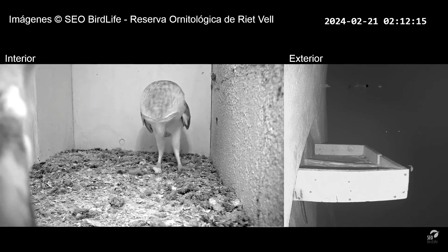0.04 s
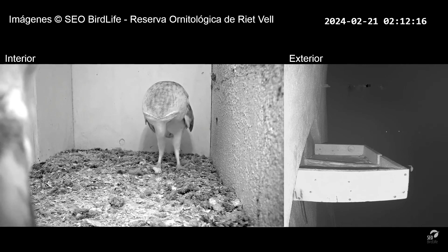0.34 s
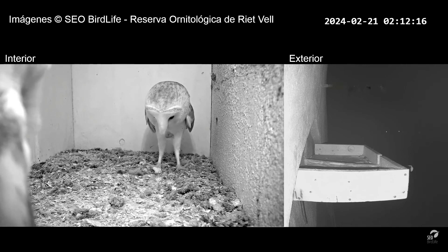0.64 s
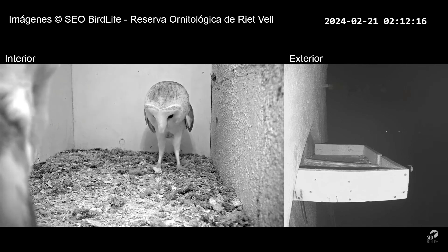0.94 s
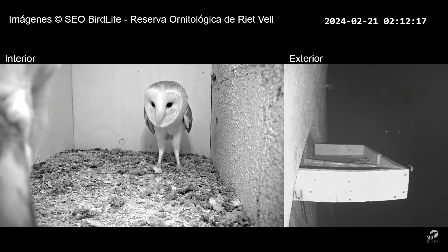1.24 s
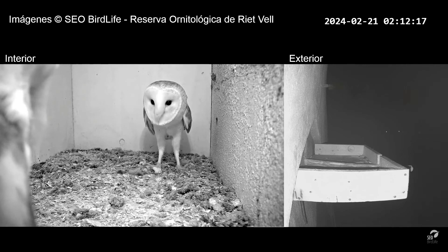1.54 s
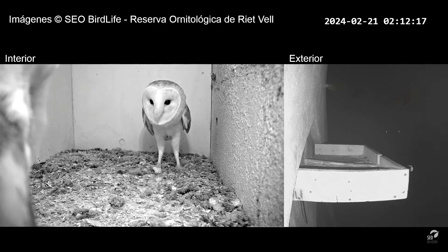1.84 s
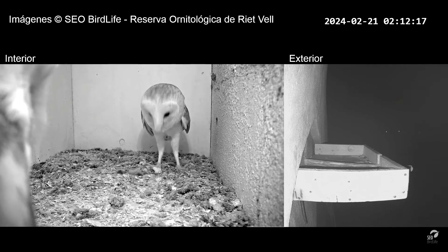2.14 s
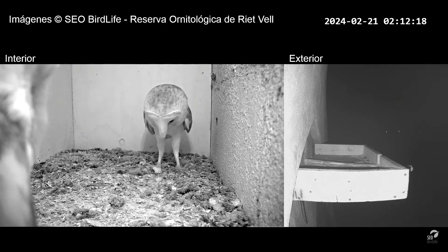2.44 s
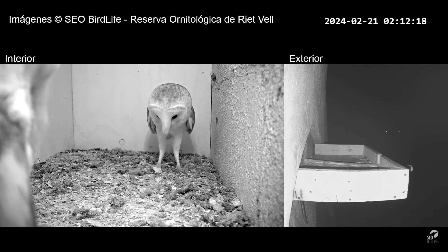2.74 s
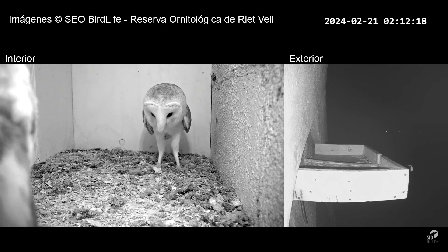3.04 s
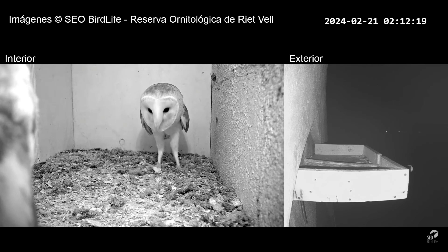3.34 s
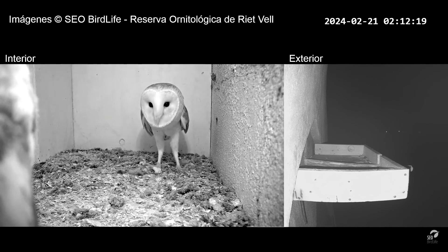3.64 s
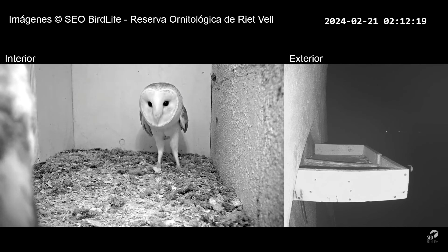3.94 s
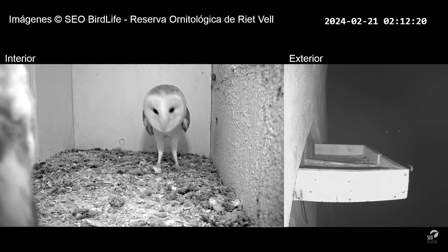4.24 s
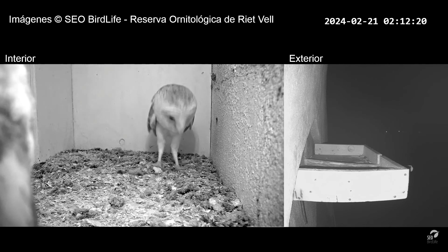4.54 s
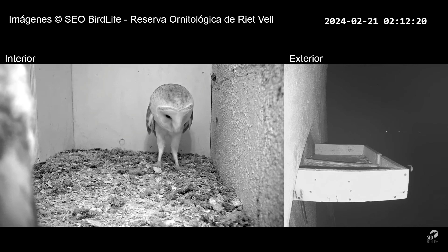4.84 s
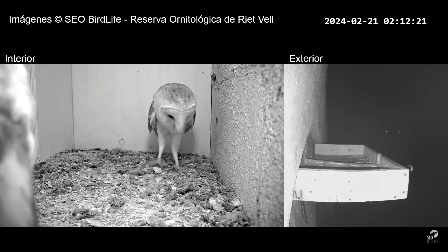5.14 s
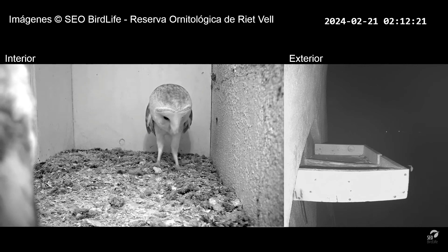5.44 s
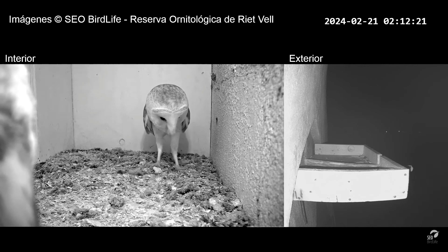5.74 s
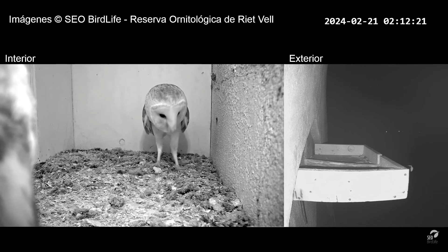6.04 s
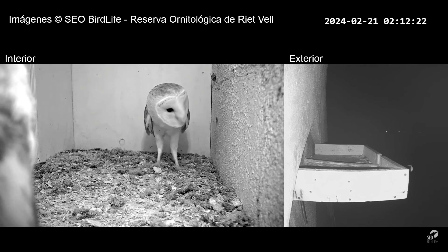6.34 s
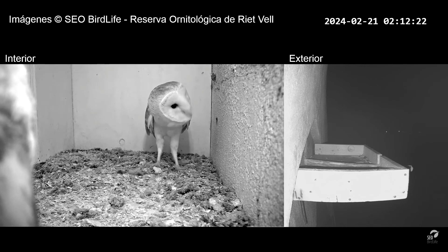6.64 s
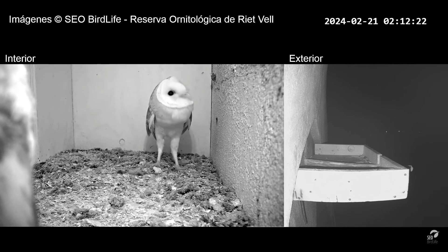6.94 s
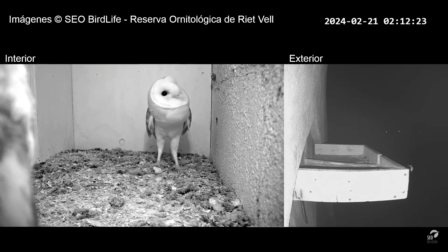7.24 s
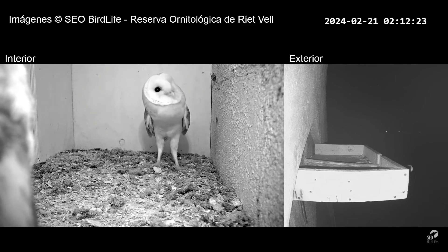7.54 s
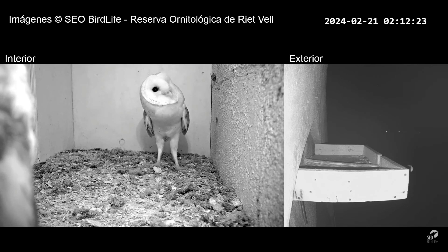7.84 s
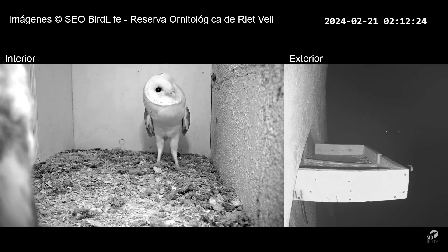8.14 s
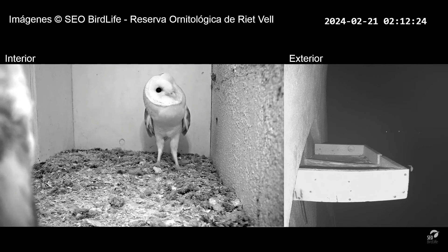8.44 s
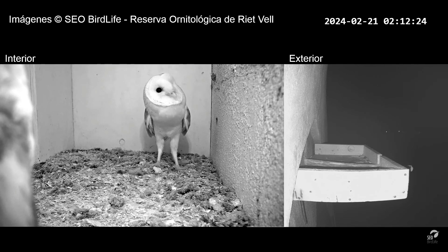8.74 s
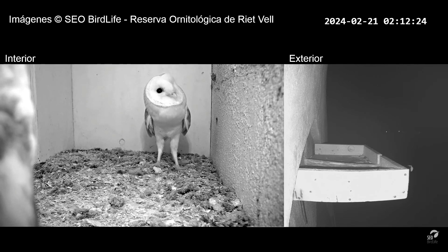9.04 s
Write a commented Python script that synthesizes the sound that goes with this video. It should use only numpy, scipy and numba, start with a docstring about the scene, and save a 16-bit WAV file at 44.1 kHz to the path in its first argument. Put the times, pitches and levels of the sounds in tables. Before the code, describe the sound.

Three loud, rasping owl screeches swell and flutter inside a wooden box, while another owl hisses faintly further off.

```python
"""A long, hissing barn owl screech, right up close in a wooden nest box: the first of three.
Each is air rasping through two throat resonances; it swells, brightens and breaks into a fast,
whistling flutter. The box colours the voice, and the small microphone overloads on the peaks.
Underneath lie night hiss and faint mains hum. A few bumps ring the boards of the box,
a second owl hisses further off, and a distant bird pipes short notes."""
import sys
import numpy as np
from scipy import signal
from scipy.fft import rfft, irfft
from scipy.io import wavfile
from numba import njit

SR = 44100
rng = np.random.default_rng(int(sys.argv[2]) if len(sys.argv) > 2 else 0)


def generate_wav(signal):
    """Clip the signal to [-1, 1] and save it as 16-bit WAV at the path in sys.argv[1]."""
    frames = np.transpose(np.atleast_2d(signal))
    scaled = np.clip(frames, -1, 1) * 32767
    pcm = np.round(scaled).astype(np.int16)
    wavfile.write(sys.argv[1], SR, pcm)


N = 409688
TIME = np.arange(N) / SR
FFT_SIZE = 2 ** 19
BIN_HZ = np.maximum(np.arange(FFT_SIZE // 2 + 1) * SR / FFT_SIZE, 1)

# The near owl's screeches. Each row: start and end in seconds, relative level in dB, swell in dB,
# upper resonance trim in dB, midpoint and spread of the flutter's fade-in in seconds, its depth 0-1.
NEAR_SCREECHES = [(-.22, 1.343, -4.5, 27, -6, 0.43, .34, .96), (2.0, 3.593, -7.5, 22, -5, 2.72, 0.26, .88),
                  (4.93, 6.435, -8, 25.5, -8.5, 5.874, .25, 0.5)]
# The two whistles in every flutter. Each row: place and length in cycles, pitch as a ratio to the main
# resonance, glide of that ratio per cycle, relative level in dB.
FLUTTER_WHISTLES = [(.9, .07, .86, .45, 7.5), (0.02, 0.043, 1.83, -1.0, 10)]
# Tone of the air rushing from the bill. Each row: frequency in Hz, gain in dB.
AIR_EQ = [(150, -20), (280, -23), (350, -3), (600, -1.5), (900, -6), (1250, 9), (2500, -4.5), (4000, -21),
          (5400, -27), (6300, -18.5), (7200, -10.5), (8400, -16.5)]
# How the open bill colours the voice. Each row: frequency in Hz, gain in dB.
BILL_EQ = [(800, -14.5), (1250, -2), (1550, -6), (2300, -1.5), (2600, -1), (3600, -4), (4000, -9),
           (4450, -0.5), (4750, -10), (5600, -3), (6400, -9.5), (7200, -5)]
# Air resonances and nulls of the box. Each row: centre in Hz, width in Hz, gain in dB.
BOX_RESONANCES = [(363, 30, 9.5), (402, 82, -9), (495, 30, 8), (634, 63, 6.5), (931, 250, -6),
                  (1125, 16, 4.5), (1170, 41, -11), (1500, 42, 10.5), (1660.5, 73, -10), (1702.2, 83, 13),
                  (1908, 18, 2), (2043, 100, -6.5), (2118, 38, 4.5), (2303, 120, 3.5), (2475, 74, -7.5),
                  (2630, 83, -8.5), (2747, 65, 6.5), (2866, 50, -7), (2972, 120, 10.5), (3050, 180, -9),
                  (3150, 56, 9), (3277, 46, 10.5), (3365, 43, -7.5), (3480, 24, 6), (3750, 50, 1.5),
                  (4370, 90, 4), (4600, 130, -7), (5000, 46, 4.5)]
# Tone of the night bed. Each row: frequency in Hz, gain in dB.
NIGHT_EQ = [(20, -2.5), (45, 3), (75, -3), (120, -11), (300, -11), (480, -13.5), (620, -11.5), (850, -16),
            (1700, -19), (4800, -23.5), (7000, -24), (8700, -39)]
# Mains hum. Each row: multiple of 50 Hz, peak level in dB.
HUM_HARMONICS = [(1, -51.5), (3, -61.5)]
# Bumps on the box. Each row: start in seconds, ring gain in dB, contact corner in Hz (lower is softer),
# clatter level in dB, scrape level in dB.
BOX_BUMPS = [(0.325, -34.5, 130, -72, -57), (4.339, -27.5, 375, -37.5, -36.5), (4.750, -27, 1200, -25, -31),
             (5.422, -34, 250, -36, -32)]
# Modes of the box's boards. Each row: frequency in Hz, relative level in dB, seconds to fall 60 dB.
BOARD_MODES = [(29.06, -10, 0.73), (53, -19.5, .5), (70.65, 2.5, 0.42), (87.2, -9.5, .4), (112, -11, 0.57),
               (139, -6.5, 0.39), (154, -9, 0.7), (182, -8.5, 0.6), (336, -21.5, 0.59), (360, -16.5, .25),
               (472, -6, 0.12), (540, 2, 0.079), (720, -11.5, 0.18), (798, -0.5, 0.027), (1086, -19, 0.075),
               (1200, -10, 0.076)]
# Tone of loose wood clattering. Each row: frequency in Hz, gain in dB.
CLATTER_EQ = [(100, -3.5), (220, -0.5), (400, -7.5), (800, -1), (1200, -28), (2000, -20.5), (5000, -35.5)]
# The far owl's hisses. Each row: start and end in seconds, relative level in dB, swell in dB,
# opening flutter rate in Hz.
FAR_CALLS = [(3.3, 4.805, -38.8, 21, 49.8), (5.6, 7.054, -40, 21, 48.3), (8.64, 10.15, -35.5, 32, 49)]
# The far owl's peaky tone. Each row: frequency in Hz, gain in dB.
FAR_EQ = [(1300, -27.5), (1690, 12.5), (1790, -2.5), (1900, 11), (2150, -6.5), (2400, 10.5), (2900, -2.5),
          (3120, 7.5), (3400, -4.5), (3780, -0.5), (4100, -15.5), (6000, -14)]
# The bird's notes. Each row: start and length in seconds, pitch near the top in Hz, relative level in dB.
BIRD_NOTES = [(3.928, 0.039, 1190, -44.5), (3.996, 0.041, 1196, -46), (4.061, 0.029, 1314, -41),
              (4.125, 0.036, 1310, -43), (4.175, 0.069, 1310, -45.5), (4.254, .035, 1260, -53),
              (4.32, 0.04, 1246, -44), (4.89, 0.023, 1070, -47.5), (4.918, 0.024, 1276, -44.5),
              (7.974, 0.044, 1162, -44), (8.059, 0.031, 1153, -44)]

ATTACK_S, SWELL_S, SAG_DB, SHUT_S, RELEASE_DB = 0.078, .55, 4, .04, 26.5
MAIN_HZ, MAIN_RISE_HZ, MAIN_SAG_HZ, MAIN_SHUT_HZ = 1704.3, 479.1, 160.25, 1186
UPPER_HZ, UPPER_RISE_HZ, UPPER_FLUTTER_HZ, UPPER_SHUT_HZ, UPPER_SWELL_DB = 2940, 322, 380, 2400, 19
FLUTTER_HZ, FLUTTER_SAG_HZ, DUCK_DB = 48.84, 3.4, 11
HOLLOW_HZ, HOLLOW_RISE_HZ, HOLLOW_WIDTH_HZ = 5500, 2760, 2400
NIGHT_DB, CEILING_DB, TOP_HZ = -56.5, -6.3, 8600


def undb(db):
    """Decibels to gain."""
    return 10 ** (np.asarray(db) / 20)


def unit(x):
    """Scale to rms 1."""
    return x / np.sqrt(np.mean(x ** 2))


def noise():
    """White noise."""
    return rng.standard_normal(N)


def drift(per_s):
    """A random control signal, rms 1, gliding to per_s new values a second."""
    points = rng.standard_normal(N // 20)
    return unit(np.interp(TIME * per_s, np.arange(len(points)), points))


def tone(hz):
    """A sine that follows a moving pitch."""
    return np.sin(2 * np.pi * np.cumsum(hz) / SR)


def shape(x, db):
    """Minimum-phase filter with the given gain at each of BIN_HZ."""
    cepstrum = irfft(db * np.log(10) / 20)
    cepstrum[1:FFT_SIZE // 2] *= 2
    cepstrum[FFT_SIZE // 2 + 1:] = 0
    return irfft(rfft(x, FFT_SIZE) * np.exp(rfft(cepstrum)))[:N]


def eq(x, points):
    """An EQ curve drawn through (Hz, dB) points."""
    hz, db = np.transpose(points)
    return shape(x, np.interp(np.log(BIN_HZ), np.log(hz), db))


@njit
def bandpass(x, tuning, damping):
    """State-variable band-pass whose centre and width can sweep."""
    out, band_state, low_state = np.empty(len(x)), 0., 0.
    for i in range(len(x)):
        band = (band_state + tuning[i] * (x[i] - low_state)) / (1 + tuning[i] * (tuning[i] + damping[i]))
        band_state = 2 * band - band_state
        low_state += 2 * tuning[i] * band
        out[i] = damping[i] * band
    return out


def hiss(hz, width_hz):
    """Turbulence through a steep resonance, rms 1."""
    hz = hz * np.ones(N)
    tuning, damping = np.tan(np.pi * hz / SR), width_hz / hz
    return unit(bandpass(bandpass(noise(), tuning, damping), tuning, damping))


def current_call(calls):
    """The columns of the call that is under way, sample by sample."""
    table = np.array(calls)
    return table[np.maximum(np.searchsorted(table[:, 0], TIME) - 1, 0)].T


def puff(phase, at, length):
    """A smooth pulse once a cycle, and the offset from its top in cycles."""
    offset = (phase - at + .5) % 1 - .5
    return np.exp(-.5 * (offset / length) ** 2), offset


def breath(start, end, full_db, swell_db):
    """One push of air: effort builds, the level sags as the air is spent, then the throat snaps shut."""
    age = np.maximum(TIME - start, 0)
    effort = 1 - np.exp(-age / SWELL_S)
    spent = np.minimum(age / (end - start), 1) ** 2
    shut = np.clip((TIME - end) / SHUT_S, 0, 2)
    attack_db = 20 * np.log10(np.clip(age / ATTACK_S, 1e-4, 1))
    level_db = full_db + attack_db - swell_db * (1 - effort) - SAG_DB * spent - RELEASE_DB * shut ** 2
    return level_db, effort, spent, np.minimum(shut, 1)


def near_owl():
    """Air rasps through two throat resonances that rise with effort, flutter and sink as it shuts."""
    start, end, full_db, swell_db, trim_db, flutter_s, fade_s, full_depth = current_call(NEAR_SCREECHES)
    level_db, effort, spent, shut = breath(start, end, full_db, swell_db)
    level_db += 1.13 * drift(14)  # the breath is never quite steady
    fluttering = (1 + np.tanh((TIME - flutter_s) / fade_s)) / 2
    depth = full_depth * fluttering * (1 - shut) ** 2
    rate_hz = (FLUTTER_HZ - FLUTTER_SAG_HZ * spent) * (1 + 0.00806 * drift(40))
    phase = np.cumsum(rate_hz) / SR % 1
    main_hz = MAIN_HZ + MAIN_RISE_HZ * effort - MAIN_SAG_HZ * spent
    main_hz += (MAIN_SHUT_HZ - main_hz) * shut
    upper_hz = UPPER_HZ + UPPER_RISE_HZ * effort + UPPER_FLUTTER_HZ * fluttering
    upper_hz += (UPPER_SHUT_HZ - upper_hz) * shut
    upper_db = trim_db - UPPER_SWELL_DB * (1 - effort) + 9 * shut
    voice = throat_rasp(main_hz, upper_hz, upper_db, phase, depth)
    voice += flutter_whistles(phase, main_hz) * depth ** 1.1
    # the membranes rattle unevenly, most of all before the flutter sets in
    rattle = undb((2.01 - 1.8 * depth) * drift(420) + .5 * drift(35))
    air = bill_air(level_db, spent, fluttering, phase, depth)
    return eq(undb(level_db) * voice * rattle, BILL_EQ) + air * rattle


def throat_rasp(main_hz, upper_hz, upper_db, phase, depth):
    """Two bands of turbulence that narrow to a squeal at each end of a call, the throat nearly closed."""
    closing = np.clip((1950 - main_hz) / 370, 0, 1)
    waver = 1 + 0.027 * drift(350)
    squeal = closing * (tone(main_hz * waver) + tone(upper_hz * waver) * undb(upper_db - 1.5))
    wobble = 1 + .05 * depth * np.sin(2 * np.pi * phase)
    main = hiss(main_hz * wobble, 610 - 90 * depth - 400 * closing) * (1 - .5 * closing)
    upper = hiss(upper_hz, 900 - 600 * closing) * undb(upper_db - 0.5 - 4.2 * depth - 7.6 * closing)
    duck, _ = puff(phase, at=0.77, length=0.09)  # the main band makes room for the whistles
    return main * undb(-DUCK_DB * depth * duck) + upper + squeal


def flutter_whistles(phase, main_hz):
    """In each cycle a low whistle slides up, then flips to a high one that slides down."""
    out = np.zeros(N)
    for at, length, ratio, glide, db in FLUTTER_WHISTLES:
        envelope, offset = puff(phase, at, length)
        hz = main_hz * (ratio + glide * offset) * (1 + .014 * drift(90))
        out += envelope * tone(hz) * undb(db + 1.3 * drift(45))
    return out


def bill_air(level_db, spent, fluttering, phase, depth):
    """Broad air noise from the open bill, with a sizzle on top from hard blowing."""
    air = unit(eq(noise(), AIR_EQ)) * undb(-34.5)
    air *= np.tanh(undb(level_db + 27.5))  # grows more slowly than the voice
    pulse_db = 5.7 * depth * np.cos(2 * np.pi * phase)  # strongest as the whistle flips
    sizzle = hiss(5700, 3600) * (0.08 + fluttering) * undb(level_db - 23.0 + pulse_db)
    rush = air + sizzle
    # a hollow in the treble climbs as the bill opens
    hollow_hz = HOLLOW_HZ + HOLLOW_RISE_HZ * np.sqrt(spent)
    return rush - bandpass(rush, np.tan(np.pi * hollow_hz / SR), HOLLOW_WIDTH_HZ / hollow_hz)


def nest_box(x):
    """Standing waves between the walls lift some bands and cancel others; treble scatters in a tail."""
    walls_db = sum(db / (1 + (2 * (BIN_HZ - hz) / width) ** 2) for hz, width, db in BOX_RESONANCES)
    direct = shape(x, walls_db - .6)
    t = TIME[:SR // 20]
    tail = rng.standard_normal(len(t)) * undb(-60 * t / 0.028)
    scattered = signal.fftconvolve(direct, tail / np.linalg.norm(tail))[:N]
    return direct + eq(scattered, [(2500, -11), (4500, -7.5)])


def night_bed():
    """Steady background hiss, a little rumble and mains hum."""
    floor = unit(eq(noise(), NIGHT_EQ)) * undb(NIGHT_DB)
    hum = sum(undb(db) * np.sin(2 * np.pi * 50 * harmonic * TIME) for harmonic, db in HUM_HARMONICS)
    return floor + hum


def box_bumps():
    """Each bump rings the boards, duller for a softer contact; loose wood clatters and litter scrapes."""
    out = np.zeros(N)
    clatter = unit(eq(noise(), CLATTER_EQ))
    scrape = hiss(4500, 6400)
    t = TIME[:SR]
    for start, ring_db, corner_hz, clatter_db, scrape_db in BOX_BUMPS:
        ring = np.zeros(SR)
        for k, (hz, mode_db, t60) in enumerate(BOARD_MODES):
            contact = (-1) ** k / np.hypot(1, hz / corner_hz)
            ring += contact * undb(mode_db - 60 * t / t60) * np.sin(2 * np.pi * hz * t)
        span = slice(int(start * SR), int(start * SR) + SR)
        out[span] += undb(ring_db) * ring
        out[span] += clatter[span] * undb(clatter_db - 60 * t / 0.12)
        out[span] += scrape[span] * undb(scrape_db - 60 * t / 0.032) * (1 - np.exp(-t / 0.0013))
    return out


def far_owl():
    """The same kind of call from a distance: a low rasp and a whistle that arches up in each flutter."""
    start, end, full_db, swell_db, rate_hz = current_call(FAR_CALLS)
    level_db, effort, spent, shut = breath(start, end, full_db, swell_db)
    phase = np.cumsum((rate_hz - FLUTTER_SAG_HZ * spent) * (1 + .015 * drift(30))) / SR % 1
    push = effort * (1 - shut)
    # the whistle sinks as the throat shuts
    whistle_hz = 3080 + 640 * np.sin(2.0 * phase) * push - 550 * shut ** 2 + 70 * drift(70)
    whistle = hiss(whistle_hz, 560) * np.sin(np.pi * phase) ** 1.5 * undb(4.5 + 11 * shut)
    rasp = hiss(1950, 571) * undb(2.6 * np.cos(2 * np.pi * phase) - 3.5) * push
    air = hiss(3600, 1500) * undb(-8)
    return eq(rasp + whistle + air, FAR_EQ) * undb(level_db - 5.5)


def piping_bird():
    """Short arched notes with weak overtones and a flickering level."""
    out = np.zeros(N)
    for start, length, hz, db in BIRD_NOTES:
        arch = np.sin(np.linspace(0, np.pi, int(length * SR)))
        phase = 2 * np.pi * np.cumsum(hz * (.93 + 0.081 * arch)) / SR
        note = np.sin(phase) + undb(-9) * np.sin(2 * phase) + undb(-22) * np.sin(4 * phase)
        first = int(start * SR)
        out[first:first + len(note)] += undb(db) * arch * note
    return out * undb(3 * drift(160))


def scene():
    """The mono mix that reaches the microphone in the box."""
    return (nest_box(near_owl()) + far_owl() + box_bumps() + piping_bird() + night_bed())[None]


def record(dry):
    """The small microphone overloads with a lopsided soft clip, and the top end is cut."""
    ceiling = undb(CEILING_DB) * (1 + .085 * np.sign(dry))
    clipped = dry / (1 + np.abs(dry / ceiling) ** 4.5) ** (1 / 4.5)
    # the slow offset of the uneven clipping drains away
    distortion = signal.sosfilt(signal.butter(1, 40, "high", fs=SR, output="sos"), clipped - dry)
    softened = eq((dry + distortion)[0], [(5000, 0.0), (6400, -4.5), (7500, -4.5), (8600, -18.0)])
    return signal.sosfilt(signal.ellip(8, .2, 70, TOP_HZ, fs=SR, output="sos"), softened)[None]


dry = scene()
out = record(dry)
generate_wav(out)
```